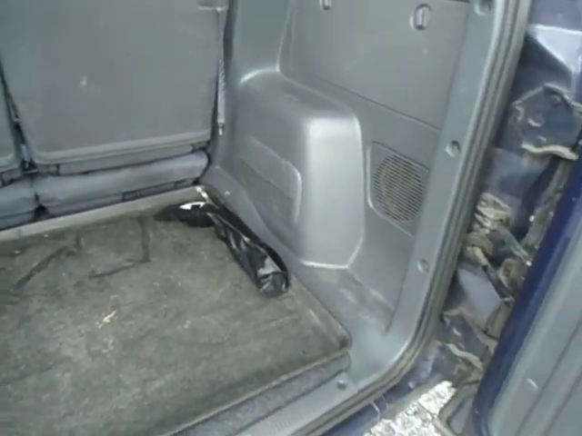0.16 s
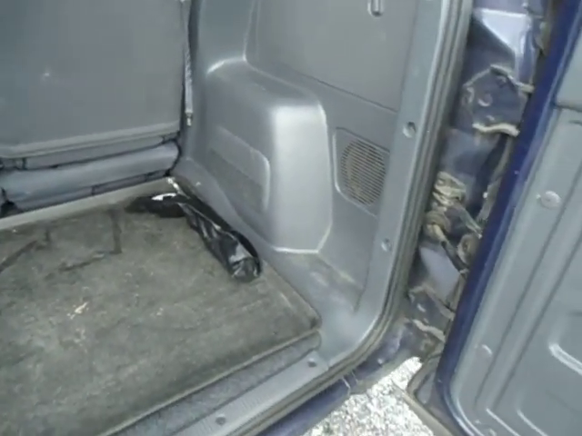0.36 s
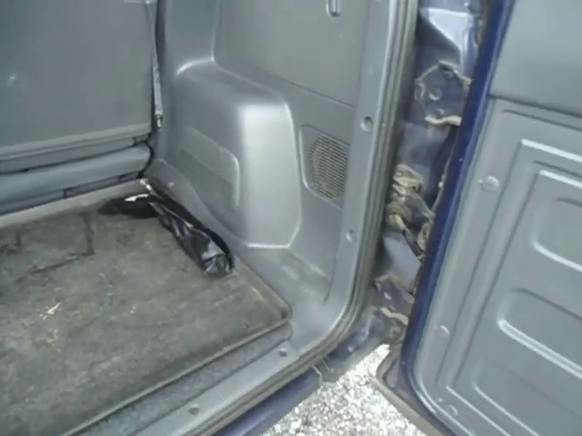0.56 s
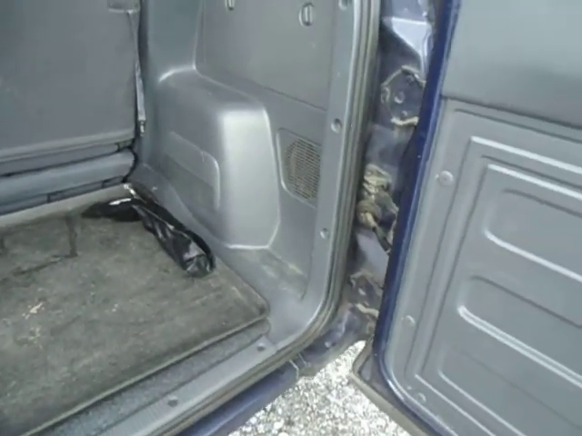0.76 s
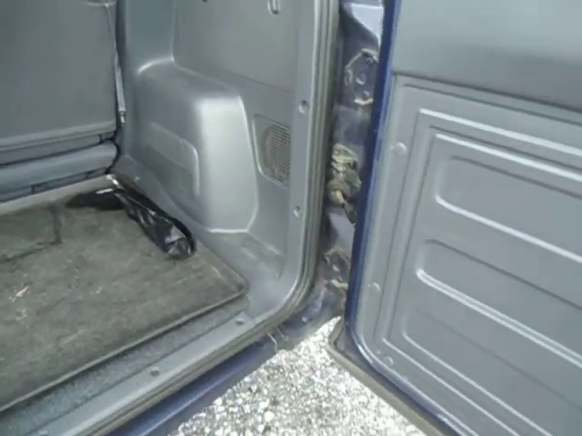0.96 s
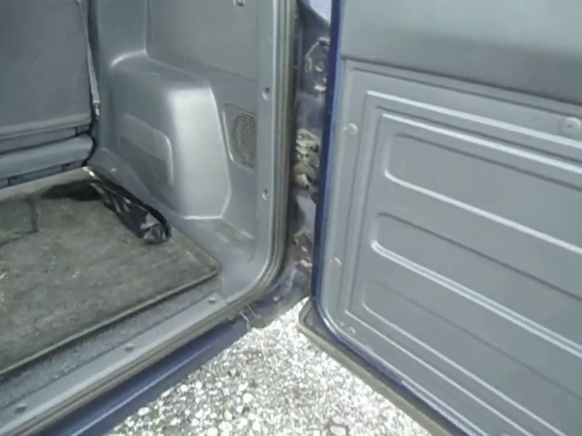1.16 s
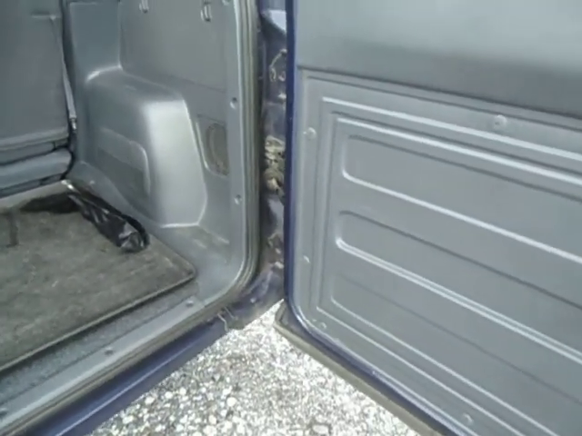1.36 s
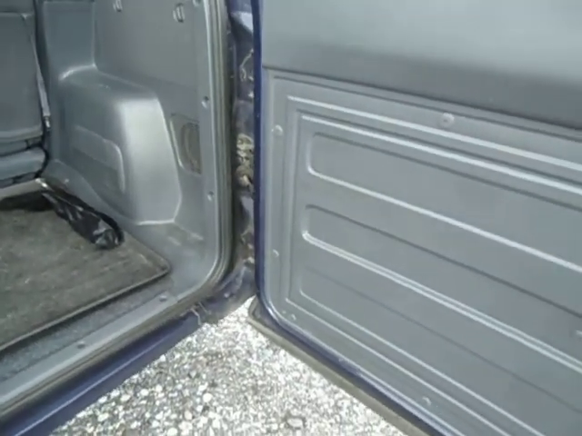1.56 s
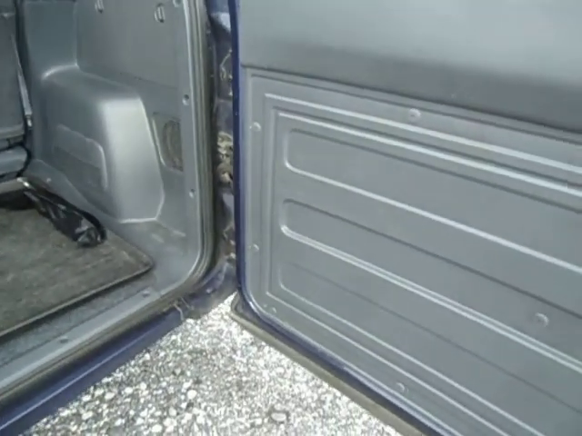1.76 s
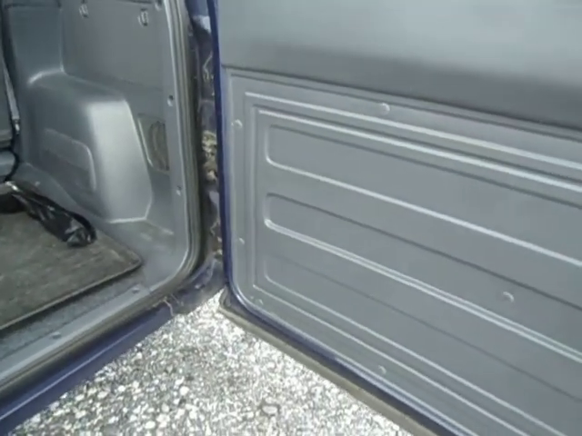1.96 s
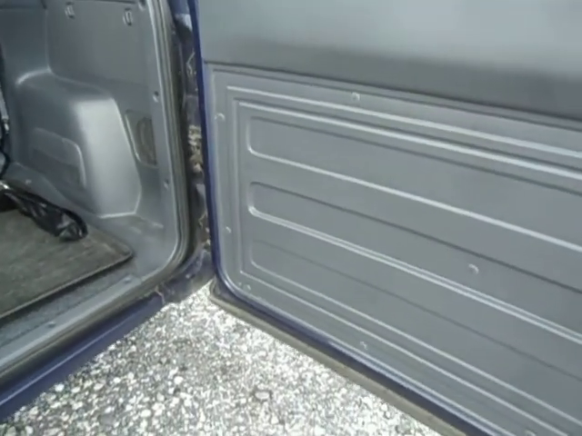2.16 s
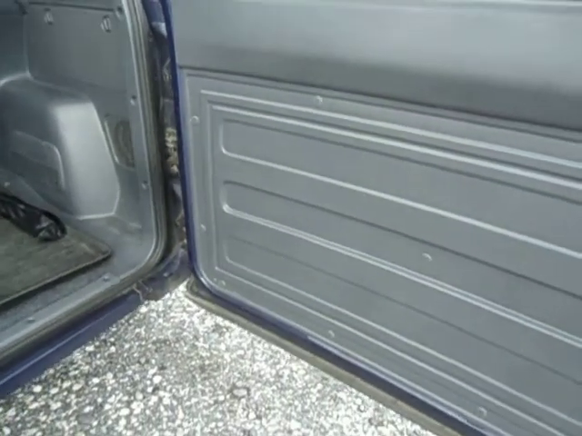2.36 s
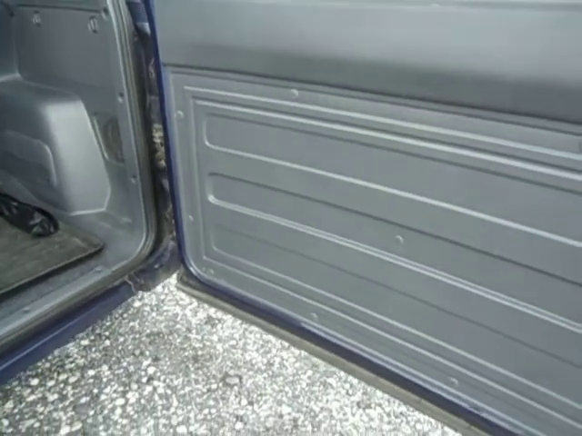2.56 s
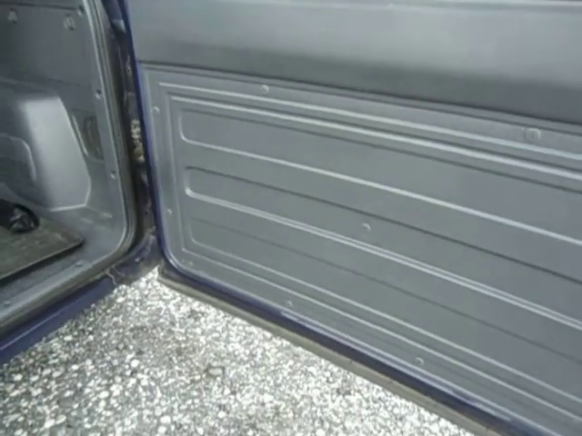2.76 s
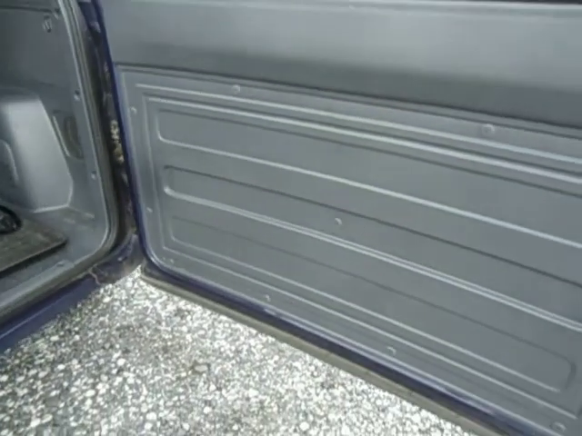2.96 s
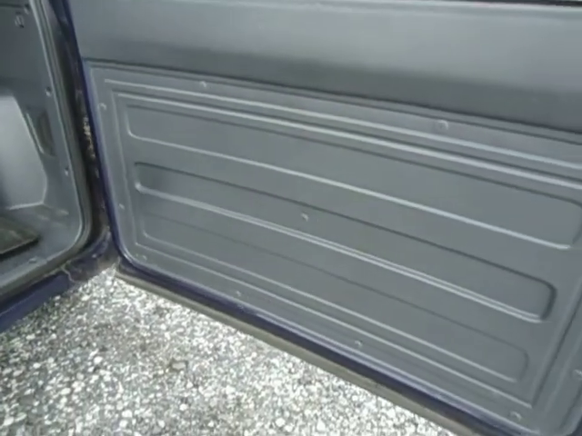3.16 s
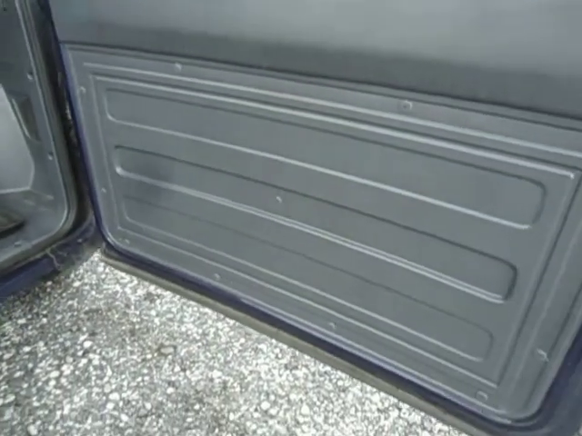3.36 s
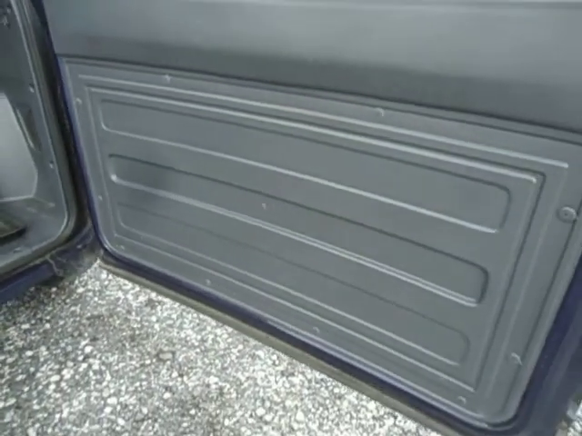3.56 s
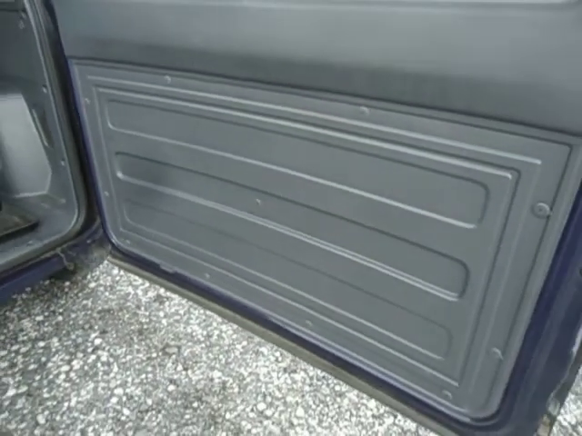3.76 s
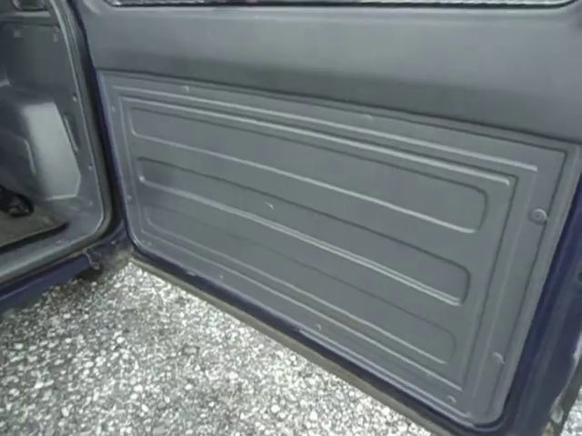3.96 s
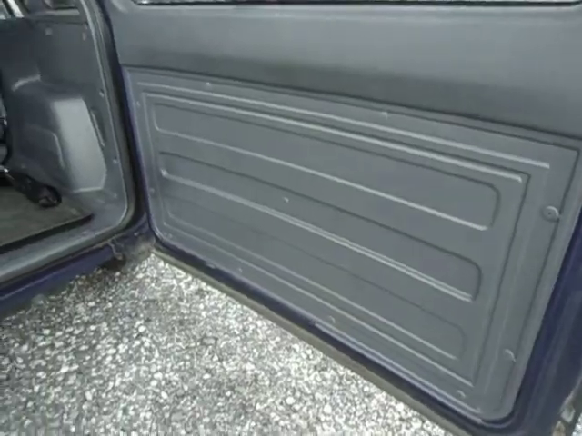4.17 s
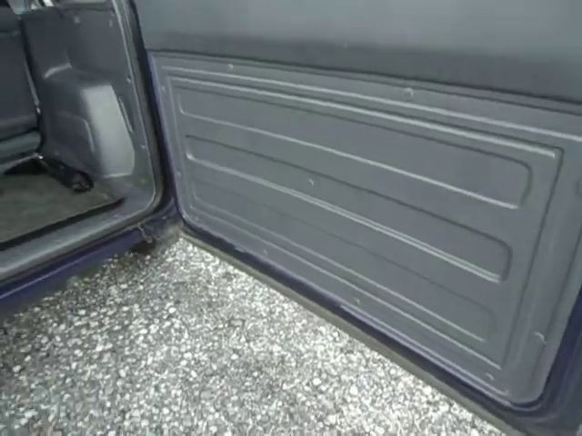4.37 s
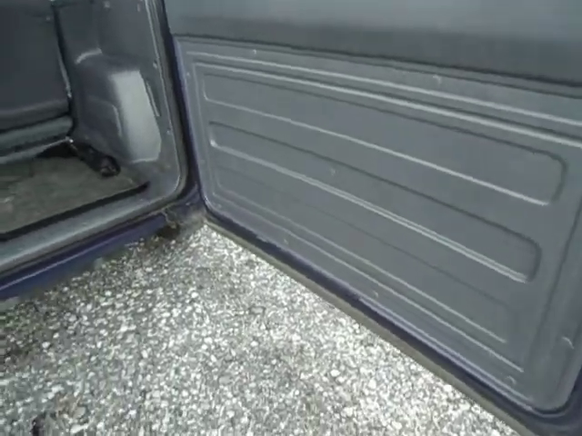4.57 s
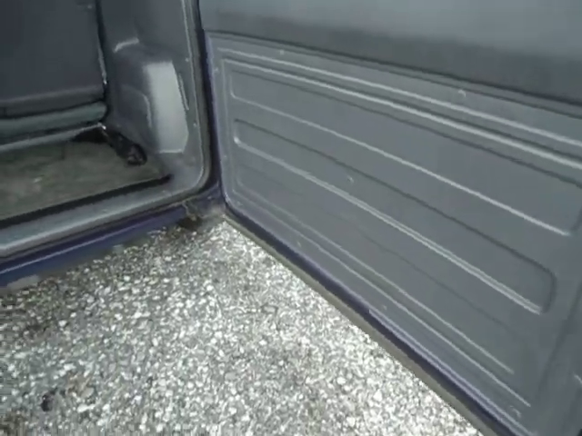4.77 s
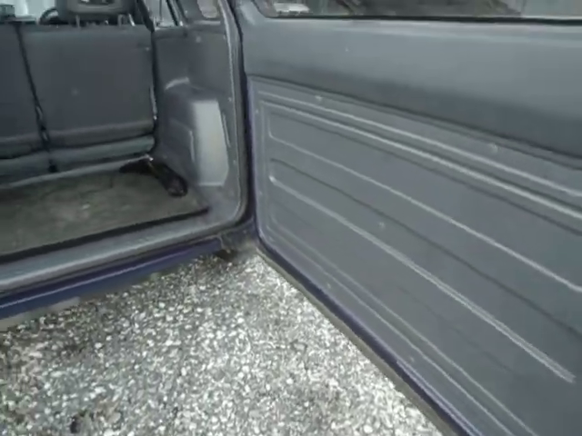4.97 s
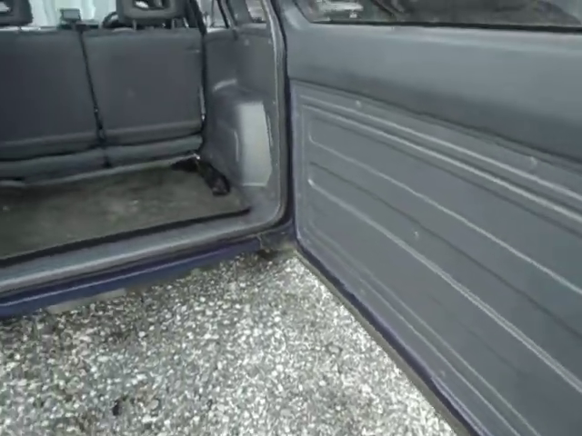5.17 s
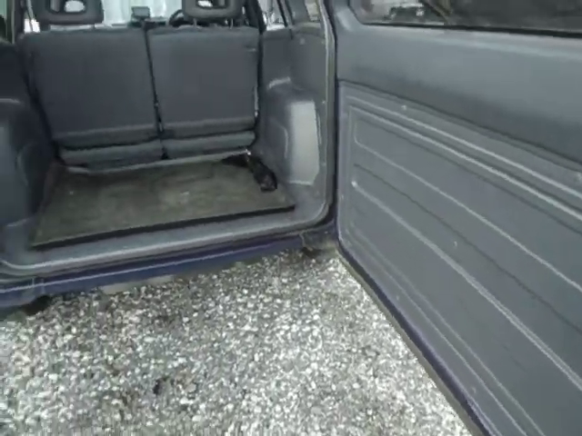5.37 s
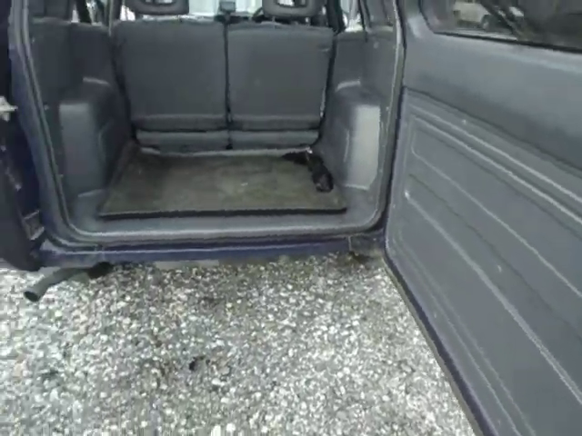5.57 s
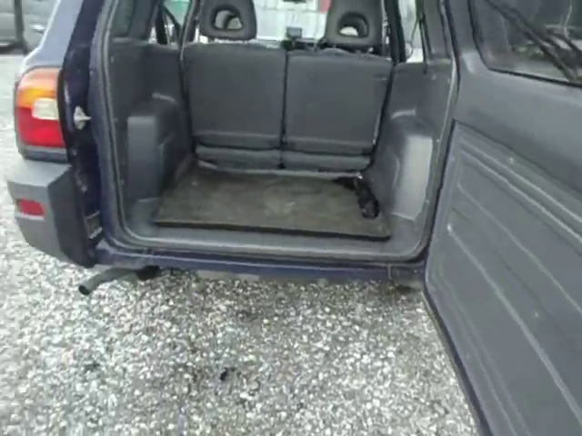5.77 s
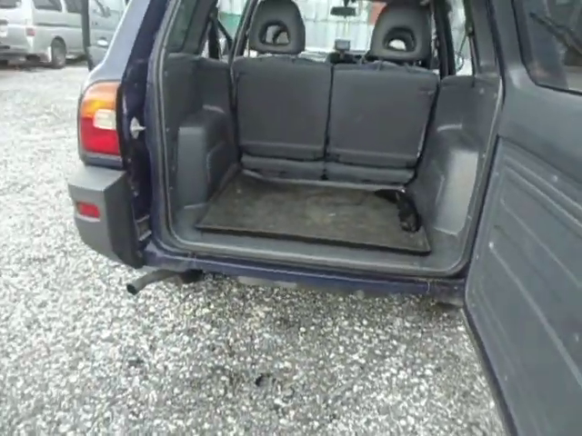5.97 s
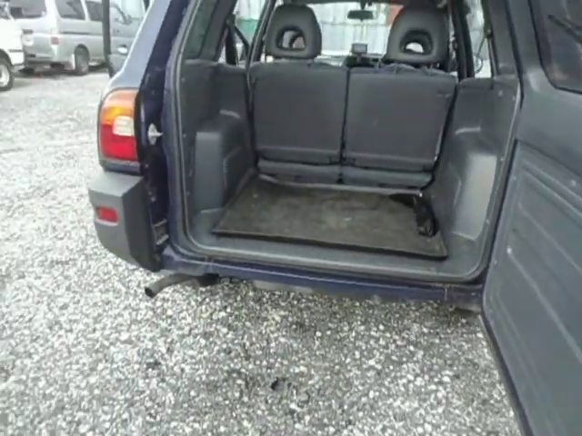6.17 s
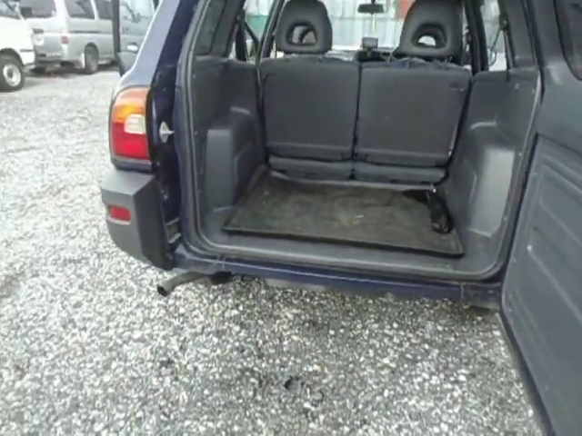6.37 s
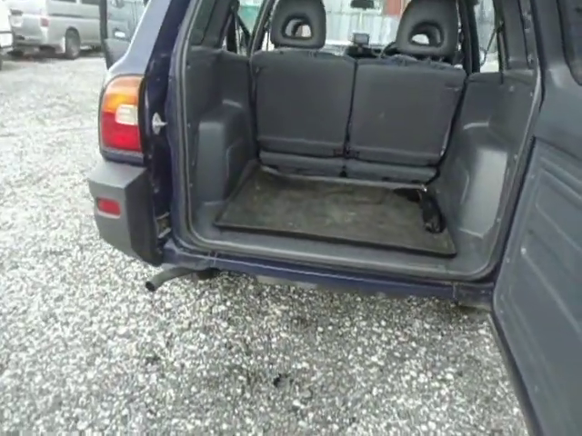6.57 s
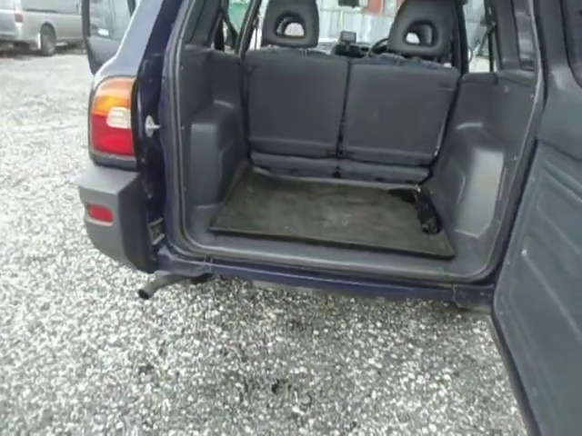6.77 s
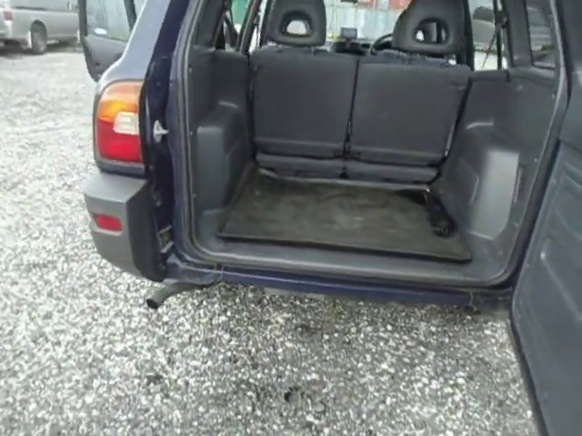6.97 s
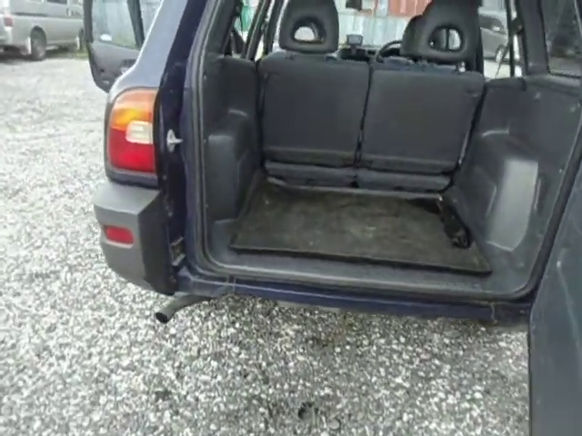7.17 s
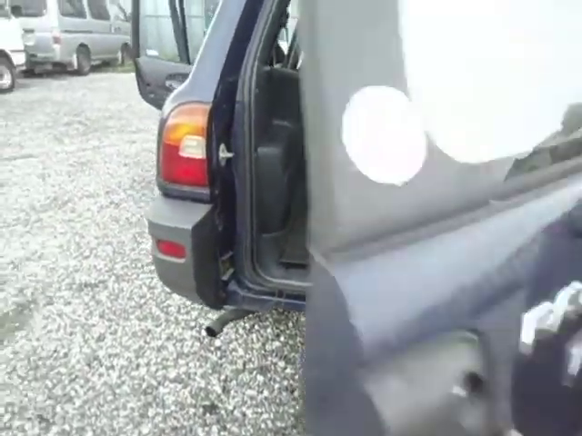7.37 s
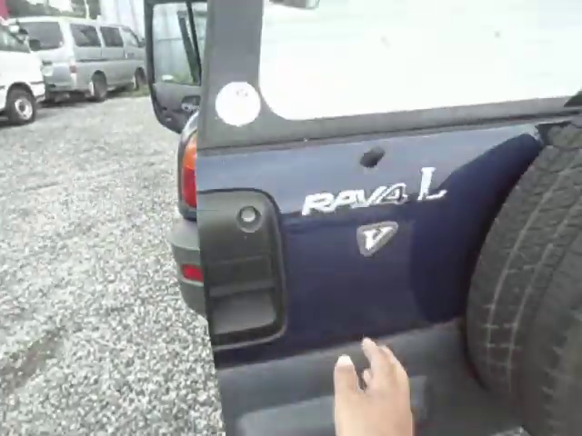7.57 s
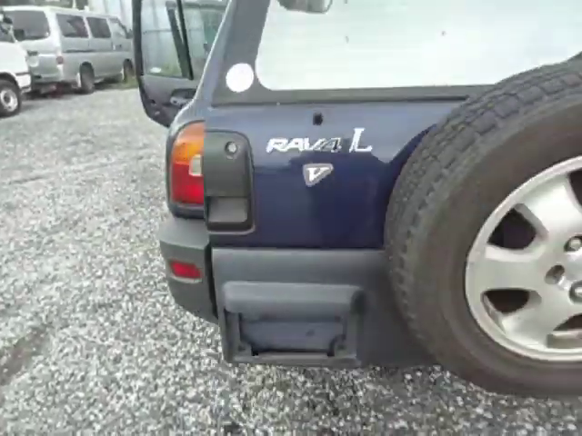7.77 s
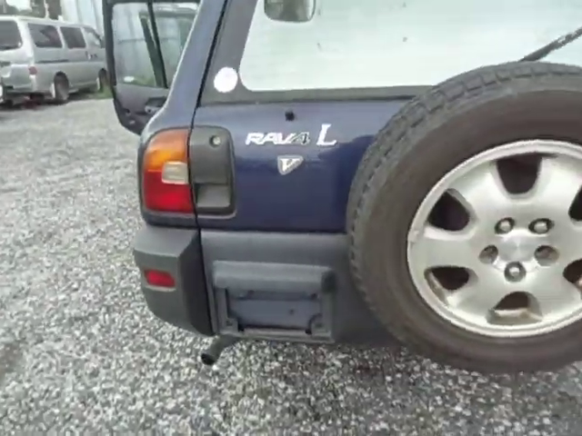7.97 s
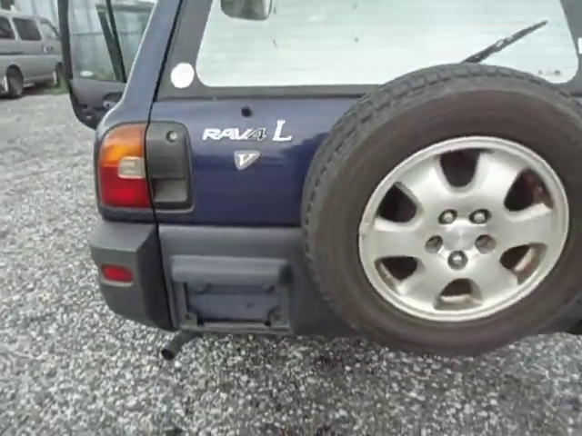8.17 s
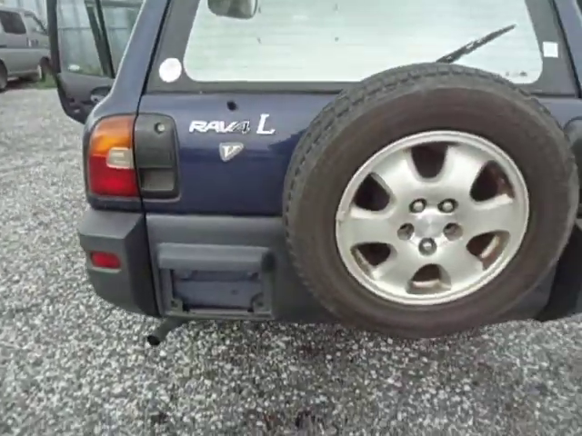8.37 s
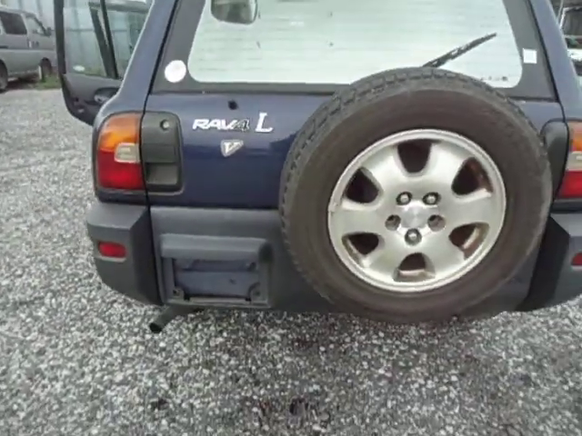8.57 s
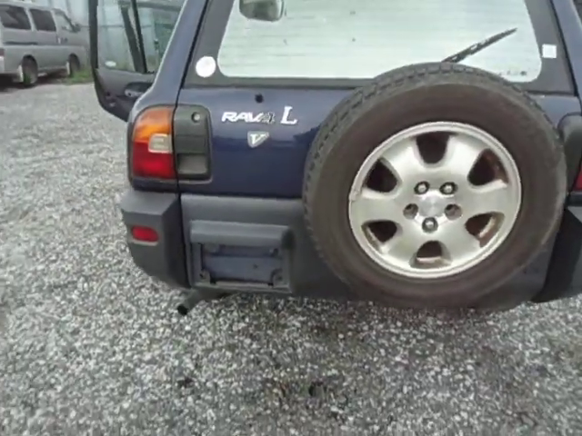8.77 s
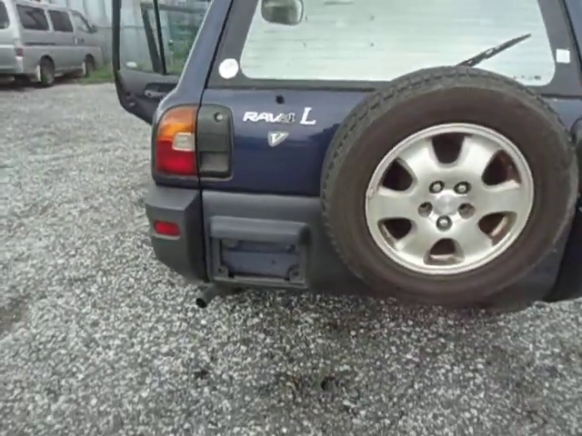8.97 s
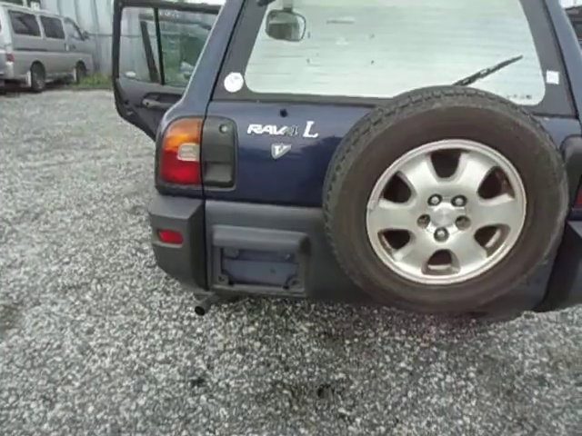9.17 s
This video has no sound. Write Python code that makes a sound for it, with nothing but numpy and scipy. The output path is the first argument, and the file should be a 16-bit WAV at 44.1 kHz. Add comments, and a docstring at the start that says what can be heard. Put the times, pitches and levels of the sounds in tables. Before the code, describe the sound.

Outdoors on a gravel yard, a small four-cylinder car idles: low drone, soft exhaust puffs, a wavering throbbing whistle and airy hiss. A few pebbles click and shoes scuff faintly. Near the end the rear door knocks on its hinges and slams with a booming, clattering, overloaded bang. The handheld microphone sounds dull, and the idle stays turned down afterwards.

```python
"""A small four-cylinder car idles on a gravel yard: drone, exhaust puffs, throbbing whistle, belt whine and hiss.
Pebbles click and shoes scuff, made from short noise, as someone steps round the open swing-out tailgate.
The door then knocks on its hinges and slams: noise bursts clank and clatter, sine modes ring panels and cabin.
The bang overloads, and the gain control then holds the idle down to the end.
The whole sound is dull, with little above 5 kHz."""
import sys
import numpy as np
from scipy import signal
from scipy.io import wavfile
from scipy.ndimage import uniform_filter1d

SR = 44100
rng = np.random.default_rng(int(sys.argv[2]) if len(sys.argv) > 2 else 0)


def transcribe(u):
    """Save the signal u as a 16-bit wav file named by the first command-line argument.

    u: samples, shape (n,) or (channels, n), limited to [-1, 1]; the rate is SR.
    q: integer samples, one column per channel.
    """
    v = np.clip(np.atleast_2d(u).T, -1, 1)
    q = np.round(v * 32767).astype(np.int16)
    wavfile.write(sys.argv[1], SR, q)


N = 406161
TIME = np.arange(N) / SR  # seconds

# walk round the car: [t/s, place from 0 at the open door to 1 well behind the car]
WALK = [(2.6, 0.023), (4.2, 0.33), (6.0, 1), (7.0, 1), (7.4, 0.91)]
# wash of engine bay and yard, by zone: [upper edge f/Hz, level/dB at the door, level/dB behind the car]
WASH_ZONES = [(720, -50, -52.5), (2050, -52.5, -47.5), (2900, -61, -55), (8000, -57, -55)]
# relative colour of the wash: [f/Hz, density/dB per Hz]
WASH_COLOUR = [(300, -7.5), (450, 0.5), (600, 3.5), (800, -0.5), (1200, 0.5), (1600, -5), (2200, -8.5),
               (3000, -6), (4000, -11), (5000, -11.5), (6000, -22)]
# brief swell of hiss: (centre t/s, Gaussian spread/s, lift level/dB)
HISS_SWELL = (4.5, 0.15, 3.6)
# relative colour of the low rumble under the drone: [f/Hz, density/dB per Hz]
RUMBLE_COLOUR = [(18, -10), (28, 3.5), (55, 0), (90, -4), (140, -4), (200, -11.5), (300, -26.5)]
# faint whine of belt and pulleys: [f/Hz, level/dB at the door, level/dB behind the car]
BELT_WHINE = [(335, -55, -65.5), (468, -60.5, -69), (859, -59.5, -64.5), (1005, -58.5, -66.5),
              (1156, -60.5, -55), (1253, -60, -64), (1432, -64.5, -61.5), (2200, -67.5, -64)]

# engine speed: [t/s, firing rate f/Hz]
FIRING_RATE = [(0, 35.96), (2.7, 35.96), (3.2, 35.7), (3.9, 35.85), (4.8, 35.69), (7, 35.67), (7.8, 35.6),
               (9.2, 35.78)]
# first five multiples of the firing rate in the drone: relative [level/dB]
ORDER_LEVELS = [-0.5, -2, -11.5, -6.5, -3.5]
# exhaust puffs of the four cylinders in firing order: relative [level/dB]
CYLINDER_LEVELS = [4, 0, -10, 6]
# exhaust pipe resonances: [f/Hz, width/Hz of each of two passes, relative level/dB]
PIPE_RESONANCES = [(204.2, 49.7, 9), (270, 93, -14), (335, 57, -25)]
# drone before its trim: [t/s, level/dB]
DRONE_LEVEL = [(0, -34), (1, -36), (3.8, -39.5), (5.1, -36.5), (6.2, -40.0), (7.6, -41.5), (8.6, -32),
               (9.2, -37.0)]
# exhaust puffs, louder as the microphone nears the tailpipe: [t/s, level/dB]
EXHAUST_LEVEL = [(0, -56), (1, -55), (1.9, -45), (2.8, -48.5), (3.7, -42.5), (5.9, -38), (7.2, -39),
                 (7.7, -44), (9.2, -41.0)]
# pipe whistle before its trim, coming and going: [t/s, level/dB]
WHISTLE_LEVEL = [(0, -51), (0.7, -60), (1.802, -65.5), (2.45, -47.5), (2.95, -44.5), (3.65, -58.0),
                 (4.2, -51.5), (4.7, -45), (5.199, -42.5), (7.0, -48), (7.6, -55.5), (8.6, -49.5),
                 (9.198, -48.5)]

# pebbles clicking underfoot:
# [t/s, peak level/dB, ring f/Hz, ring width/Hz of each of two passes, dull knock level/dB against the ring]
PEBBLES = [(2.268, -26, 1680, 1000, 3), (3.867, -23.5, 1900, 1800, 3), (4.076, -22.5, 2970, 1400, -3),
           (5.0997, -17, 3290, 1000, -5), (5.108, -16, 3440, 900, -2)]
# shoes shifting on the gravel:
# [centre t/s, crunch level/dB, Gaussian spread/s, thud f/Hz, thud level/dB against the crunch]
SCUFFS = [(3.195, -41, 0.0072, 1170, -6), (3.219, -43, 0.011, 500, 5.5), (3.238, -44, .005, 1420, -6),
          (4.926, -42, 0.009, 468, -2), (6.734, -45, 0.023, 1025, -2)]
# relative colour of the crunch: [f/Hz, density/dB per Hz]
SCUFF_COLOUR = [(200, 1), (500, -0.5), (750, 6), (1400, -6), (2500, -13.5), (4000, -12), (6000, -22)]

# relative colour of the clatter of trim, latch and glass: [f/Hz, density/dB per Hz]
CLATTER_COLOUR = [(60, 12), (100, 13), (280, 7), (500, 4), (750, -4), (1100, -7.5), (1700, -10),
                  (2300, -6.5), (3300, -20), (5000, -12), (6500, -20)]
# its basic decay, which each blow scales: [f/Hz, t60/s]
CLATTER_DECAY = [(60, 0.47), (300, 0.62), (1000, 0.34), (3000, 0.46), (6000, 0.21)]
# steel panel modes, pitch and level scattered at each blow: [centre f/Hz, mean level/dB, t60/s]
PANEL_MODES = [(126, -4.5, .28), (185, -6.5, 0.21), (253, 0.5, 0.36), (284.8, -5, 0.52), (288.3, -10, 0.75),
               (344.7, -8.5, 0.42), (437, -6, 0.25), (468, -12.5, 0.24), (524, -17.5, 0.42),
               (630, -9, 0.077), (707, -13.5, 0.3), (830, -12, 0.2), (1016, -17, 0.17), (1120, -19, 0.2),
               (1288, -17, 0.2), (1511, -19, 0.39), (1909, -26, .33), (2493, -25, .33), (3300, -25, .55)]
# latch and striker resonances: [f/Hz, width/Hz, relative level/dB]
LATCH_RESONANCES = [(787, 150, -6.5), (1090, 490, 1), (1490, 300, -9.5), (1900, 300, -15), (2500, 340, -11),
                    (3250, 440, -11)]
# cabin air and the body on its springs: [f/Hz, level/dB, t60/s]
CABIN_MODES = [(42.1, 2.5, 0.75), (49.4, -3, .35), (69.7, -2, 0.55)]
# the swinging door knocks on its hinges: [t/s, clatter level/dB, brightness limit f/Hz]
HINGE_KNOCKS = [(7.277, -30.5, 1300), (7.421, -27.5, 2400), (7.772, -20.5, 1800), (7.869, -29.5, 1600)]
# shaken trim and lock parts: [t/s, clatter level/dB]
RATTLES = [(7.937, -9), (7.984, -14), (8.046, -15.5), (8.104, -17.5), (8.126, -25), (8.155, -22),
           (8.178, -25), (8.228, -31)]

RUMBLE_DB, DRONE_TRIM_DB, WHISTLE_TRIM_DB = -38, -0.5, -0.5
UPPER_ORDERS_FOLLOW = .25  # share of the exhaust's dB swing that the upper orders take
KNOCK_BOUNCE_S, KNOCK_BOUNCE_DB = .016, -6  # lag and level against the knock
# the latch meets the striker, the door lands on its seal, then the cabin booms
CATCH_S, CATCH_DB = 7.8945, -12.5
SLAM_S, SLAM_DB = 7.902, 1.5
SHUT_S = 7.905
# rebounds hold briefly, then their energy falls as a power of time and they grow duller
REBOUND_S, REBOUND_HOLD_S, REBOUND_FALL, REBOUND_DULLING_OCT_PER_S = .0249, .047, 5.6, 5.0
DULL_TOP_HZ, CUTOFF_HZ = 4966, 16900


def from_db(db):
    """Turn decibels into gain."""
    return np.exp(np.asarray(db) * (np.log(10) / 20))


def rms_one(x):
    """Scale to unit rms."""
    return x / np.sqrt(np.mean(x ** 2) + 1e-20)


def in_time(rows):
    """Draw each column of a curve at every sample."""
    s, *columns = np.transpose(rows)
    return [np.interp(TIME, s, c) for c in columns]


def at_hz(points, hz):
    """Read a spectrum on a log-frequency axis."""
    point_hz, values = np.transpose(points)
    return np.interp(np.log(hz), np.log(point_hz), values)


def add(out, s, sound):
    """Mix a sound in at a time in seconds."""
    i = int(s * SR)
    out[i:i + len(sound)] += sound[:N - i]


def drift(rate_hz):
    """Random wander of unit rms: noise through two equal low-pass poles, run at every 40th sample."""
    r = np.exp(-80 * np.pi * rate_hz / SR)
    noise = rng.standard_normal(N // 40 + 2002)
    slow = signal.lfilter([1], [1, -2 * r, r * r], noise)[2000:]  # skip the filter's run-in
    return np.interp(np.arange(N) / 40, np.arange(len(slow)), rms_one(slow))


def resonance(x, hz, width_hz):
    """Two-pole resonance with gain 1 on top."""
    r = np.exp(-np.pi * width_hz / SR)
    zeros = np.array([1, 0, -1]) * (1 - r * r) / 2
    poles = [1, -2 * r * np.cos(2 * np.pi * hz / SR), r * r]
    return signal.lfilter(zeros, poles, x + 1e-18)


def double_resonance(x, hz, width_hz):
    """The same resonance twice over, for steeper skirts."""
    return resonance(resonance(x, hz, width_hz), hz, width_hz)


def low_pass(x, hz, order=2):
    """Butterworth low-pass."""
    return signal.sosfilt(signal.butter(order, min(hz, .45 * SR), fs=SR, output="sos"), x)


def dying(t, t60):
    """Exponential decay, 60 dB down at t60."""
    return np.exp(-np.log(1000) * t / t60)


def noise_bands(colour, size):
    """Centres and rows of half-octave noise bands whose sum has unit spread."""
    edges = 16 * 2 ** np.arange(0, 9.1, .5)
    white = rng.standard_normal((2, size))  # neighbouring bands take different noise
    centres, rows = [], []
    for k, (low, high) in enumerate(zip(edges, edges[1:])):
        hz = np.sqrt(low * high)
        if colour[0][0] <= hz <= colour[-1][0]:
            band = signal.butter(2, [low, high], "band", fs=SR, output="sos")
            centres.append(hz)
            rows.append(from_db(at_hz(colour, hz)) * signal.sosfilt(band, white[k % 2]))
    return np.array(centres), np.array(rows) / np.std(np.sum(rows, axis=0))


def by_place(door_db, behind_db):
    """A level that slides between two values as the microphone moves behind the car."""
    return door_db + in_time(WALK)[0] * (behind_db - door_db)


def wash(firings, pulse_db=0.5, wander_db=0.22, flutter_db=.5):
    """Steady rumble under fan air and hiss; the air follows the place and pulses a little with each firing."""
    hz, bands = noise_bands(WASH_COLOUR, N)
    zone = np.digitize(hz, [edge for edge, _, _ in WASH_ZONES])
    swell_s, spread_s, peak_db = HISS_SWELL
    swell_db = peak_db * np.exp(-.5 * ((TIME - swell_s) / spread_s) ** 2)
    air = 0
    for k, (_, door_db, behind_db) in enumerate(WASH_ZONES):
        level_db = by_place(door_db, behind_db) + wander_db * drift(2)
        if k >= 2:  # only the upper zones swell
            level_db = level_db + swell_db
        air = air + from_db(level_db) * rms_one(bands[zone == k].sum(0))
    pulse = from_db(pulse_db * np.cos(2 * np.pi * firings) + flutter_db * drift(22))
    rumble = noise_bands(RUMBLE_COLOUR, N)[1].sum(0)
    return air * pulse + from_db(RUMBLE_DB) * rumble


def belt(waver_rad=1.44, flutter_db=2.5):
    """Sine tones with wavering phase, whose balance shifts as the microphone moves behind the car."""
    whine = 0
    for hz, door_db, behind_db in BELT_WHINE:
        level = from_db(by_place(door_db, behind_db) + flutter_db * drift(9.2))
        whine = whine + level * np.sin(2 * np.pi * hz * TIME + waver_rad * drift(5.8))
    return whine


def engine_drone(turn, drone_db, exhaust_db):
    """Cosines on the firing orders, each wandering in level and phase."""
    upper_db = np.mean(drone_db) + UPPER_ORDERS_FOLLOW * (exhaust_db - np.mean(exhaust_db))
    drone = 0
    for k, db in enumerate(ORDER_LEVELS):
        level_db = drone_db if k < 2 else upper_db  # the upper orders partly follow the exhaust
        level = from_db(level_db + db + 1.0 * drift(1.9))
        drone = drone + level * np.cos((k + 1) * turn + 0.29 * drift(1.8))
    return drone


def exhaust_puffs(firings):
    """One uneven impulse per cylinder excites the pipe resonances."""
    at = np.flatnonzero(np.diff(np.floor(firings + 0.3024)))  # 0.3 of a firing ahead of the drone's crest
    cylinder = np.round(firings[at]).astype(int) % len(CYLINDER_LEVELS)
    puffs = np.zeros(N)
    puffs[at] = from_db(np.array(CYLINDER_LEVELS)[cylinder] + rng.normal(0, 1.0, len(at)))
    return rms_one(sum(from_db(db) * double_resonance(puffs, hz, width) for hz, width, db in PIPE_RESONANCES))


def pipe_whistle(turn, throb_db=4.5, flat_top_db=2.0, swing_rad=0.93, waver_rad=0.21, flutter_db=0.7):
    """A tone at 18 times the firing rate throbs once per four firings; stronger flow lifts its pitch."""
    cycle = turn / len(CYLINDER_LEVELS) - .25  # the swell lags by a quarter radian
    throb = from_db(throb_db * np.cos(cycle) - flat_top_db * np.cos(2 * cycle) + flutter_db * drift(20))
    phase = 18 * turn + swing_rad * np.sin(cycle) + waver_rad * drift(13)
    return rms_one(throb * np.sin(phase))


def engine(firings):
    """Drone, exhaust puffs and whistle, all locked to the firings and each riding its own level."""
    drone_db, exhaust_db, whistle_db = (in_time(c)[0] for c in (DRONE_LEVEL, EXHAUST_LEVEL, WHISTLE_LEVEL))
    turn = 2 * np.pi * firings
    drone = from_db(DRONE_TRIM_DB) * engine_drone(turn, drone_db, exhaust_db)
    puffs = from_db(exhaust_db) * exhaust_puffs(firings)
    whistle = from_db(whistle_db + WHISTLE_TRIM_DB) * pipe_whistle(turn)
    return drone + puffs + whistle


def pebbles(contact_t60=0.0085, dull_hz=1050, dull_width_hz=900):
    """Each contact is a noise tick that excites a short ring and a dull knock."""
    out, t = np.zeros(N), TIME[:SR // 20]
    for s, db, hz, width, dull_db in PEBBLES:
        contact = rng.standard_normal(len(t)) * dying(t, contact_t60)
        ring = rms_one(double_resonance(contact, hz, width))
        knock = rms_one(double_resonance(contact, dull_hz, dull_width_hz))
        tick = ring + from_db(dull_db) * knock
        add(out, s, from_db(db) * tick / np.abs(tick).max())
    return out


def scuffs(thud_width_hz=130, grain_db=5):
    """A shifting shoe gives a soft swell of grainy noise with a resonant thud in it."""
    out = np.zeros(N)
    crunch = rms_one(noise_bands(SCUFF_COLOUR, N)[1].sum(0) * from_db(grain_db * drift(140)))
    for s, db, spread_s, thud_hz, thud_db in SCUFFS:
        thud = rms_one(double_resonance(crunch, thud_hz, thud_width_hz))
        swell = np.exp(-.5 * ((TIME - s) / spread_s) ** 2)
        out += from_db(db) * swell * (crunch + from_db(thud_db) * thud)
    return out


def blow(s, db, ring_db, clank_db, decay, top_hz):
    """One contact at a time and clatter level; panel ring and latch clank are set against the clatter."""
    return s, db, db + ring_db, decay, top_hz, db + clank_db


def rebound(age, top_hz=4300):
    """The door on its seal, weaker and duller the longer after its first landing."""
    db = SLAM_DB - 10 * np.log10(1 + (age / REBOUND_HOLD_S) ** REBOUND_FALL)
    limit_hz = top_hz * 2 ** (-REBOUND_DULLING_OCT_PER_S * age)
    return blow(SLAM_S + age, db, ring_db=-5.5, clank_db=0, decay=.4, top_hz=limit_hz)


def blows(count=7):
    """Hinge knocks with a duller bounce each, the latch catching, the slam and its rebounds, the rattles."""
    knocks = [blow(s, db, ring_db=-13, clank_db=-2, decay=.36, top_hz=top_hz)
              for s, db, top_hz in HINGE_KNOCKS]
    bounces = [blow(s + KNOCK_BOUNCE_S, db + KNOCK_BOUNCE_DB, ring_db=-11, clank_db=-6, decay=.28, top_hz=1200)
               for s, db, _ in HINGE_KNOCKS]
    catch = blow(CATCH_S, CATCH_DB, ring_db=-10.0, clank_db=15, decay=0.31, top_hz=1300)
    slam = [rebound(age) for age in REBOUND_S * np.arange(count)]
    rattles = [blow(s, db, ring_db=-5.5, clank_db=-2, decay=.6, top_hz=2700) for s, db in RATTLES]
    return knocks + bounces + [catch] + slam + rattles


def panel_ring(t):
    """Decaying sine modes of the steel panel, struck with random signs and slightly uneven strengths."""
    mode_hz, mode_db, mode_t60 = np.transpose(PANEL_MODES)
    count = len(PANEL_MODES)
    strengths = from_db(mode_db + rng.normal(0, 1.2, count)) * rng.choice([-1, 1], count)
    # each blow rings at slightly scattered pitches, for a rougher, less tonal ring
    scattered_hz = mode_hz * (1 + rng.normal(0, .03, count))
    return strengths @ (np.sin(2 * np.pi * scattered_hz[:, None] * t) * dying(t, mode_t60[:, None]))


def cabin_boom(t):
    """Low sine modes of the cabin air and the sprung body, pumped by the closing door."""
    return sum(from_db(db) * np.sin(2 * np.pi * hz * t) * dying(t, t60) for hz, db, t60 in CABIN_MODES)


def tailgate(clank_t60=0.053, grain_db=4.5):
    """Each blow clanks the latch, sets off grainy clatter and rings the panel; the closing door booms the cabin."""
    size = int(.55 * SR)
    out, t = np.zeros(N), TIME[:size]
    grain = rms_one(from_db(grain_db * drift(140)))
    latch = rms_one(sum(from_db(db) * resonance(rng.standard_normal(N), hz, width)
                        for hz, width, db in LATCH_RESONANCES))
    for s, clatter_db, ring_db, decay, top_hz, clank_db in blows():
        span = slice(int(s * SR), int(s * SR) + size)
        hz, bands = noise_bands(CLATTER_COLOUR, size)
        tails = dying(t, decay * at_hz(CLATTER_DECAY, hz)[:, None])
        clatter = from_db(clatter_db) * grain[span] * (bands * tails).sum(0)
        ring = from_db(ring_db) * panel_ring(t)
        clank = from_db(clank_db) * latch[span] * dying(t, clank_t60)
        add(out, s, low_pass(clatter + ring + clank, top_hz))
    add(out, SHUT_S, cabin_boom(t))
    return out


def scene():
    """Idle, footing and door at one microphone."""
    firings = np.cumsum(in_time(FIRING_RATE)[0]) / SR
    background = wash(firings) + belt() + engine(firings)
    footing = pebbles() + scuffs()
    return (background + footing + tailgate())[None]


def gain_control(x, threshold_db=-12, most_db=7.0, attack_s=0.05):
    """A loud sound turns the gain down by a few dB, and it stays at the deepest cut reached."""
    level_db = 10 * np.log10(np.abs(uniform_filter1d(x ** 2, size=256)) + 1e-12)
    cut_db = np.maximum.accumulate(np.clip(level_db - threshold_db, 0, most_db), axis=-1)
    r = np.exp(-1 / (attack_s * SR))
    return x * from_db(-signal.lfilter([1 - r], [1, -r], cut_db))


def record(dry):
    """A low-pass near 5 kHz, gain control, hard overload, a smoothing filter whose overshoots clip, a top cut."""
    levelled = gain_control(low_pass(dry, DULL_TOP_HZ, order=12))
    clipped = np.clip(levelled, -.63, .63)
    smoothed = np.clip(low_pass(clipped, 5500, order=14), -.79, .79)
    top_cut = signal.cheby2(12, 70, CUTOFF_HZ, fs=SR, output="sos")
    return signal.sosfilt(top_cut, smoothed)


dry = scene()
out = record(dry)
transcribe(out)
```